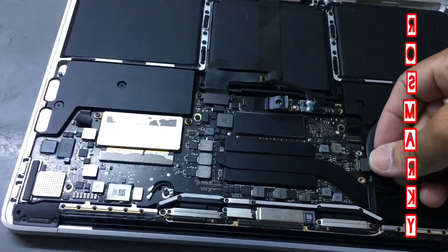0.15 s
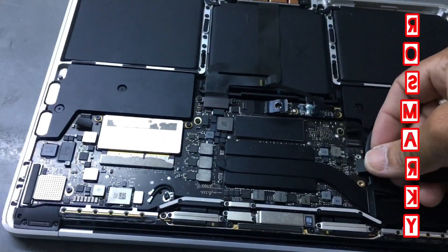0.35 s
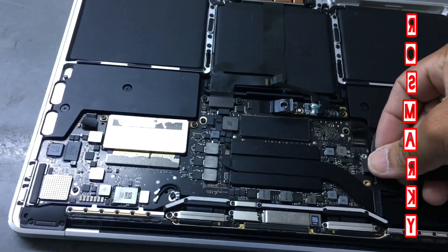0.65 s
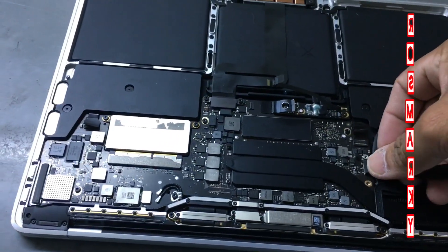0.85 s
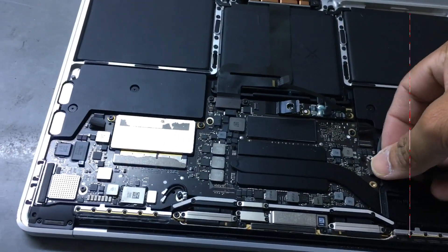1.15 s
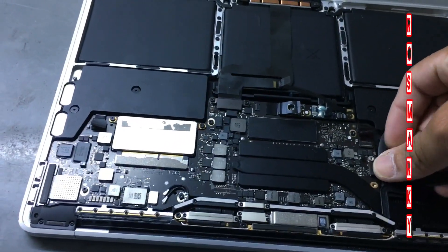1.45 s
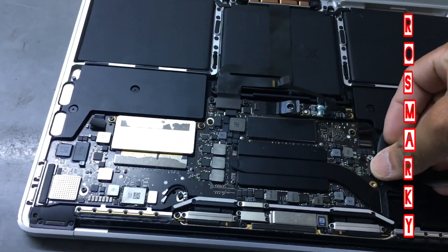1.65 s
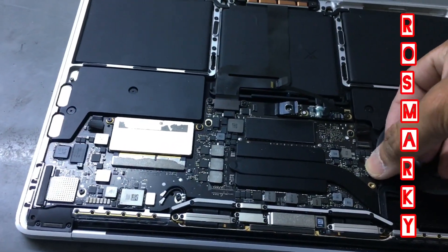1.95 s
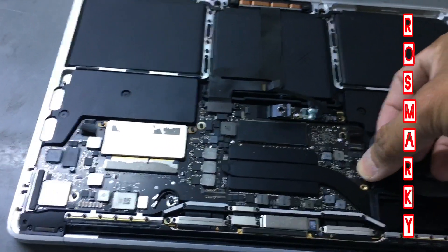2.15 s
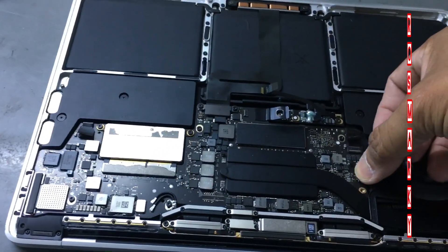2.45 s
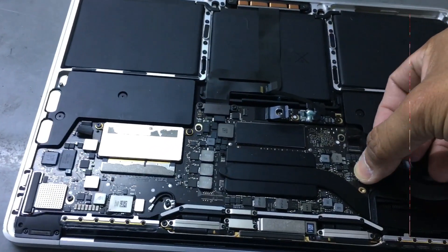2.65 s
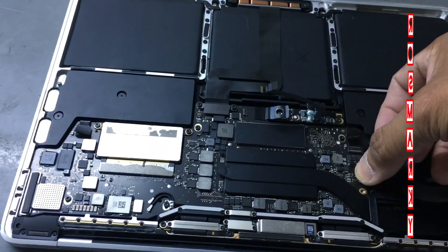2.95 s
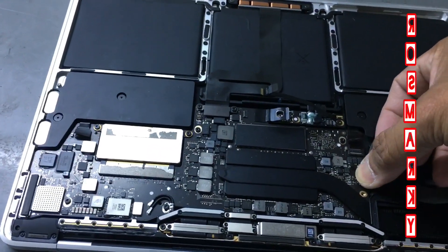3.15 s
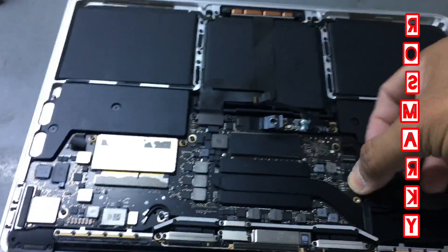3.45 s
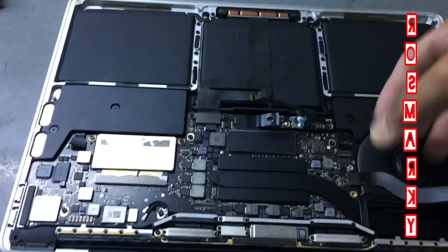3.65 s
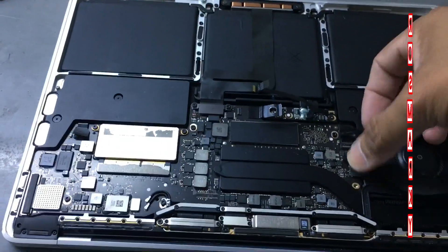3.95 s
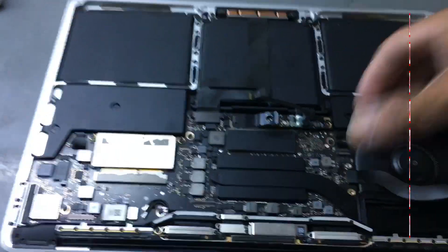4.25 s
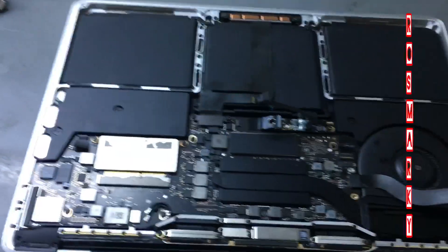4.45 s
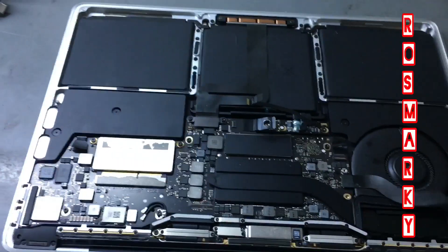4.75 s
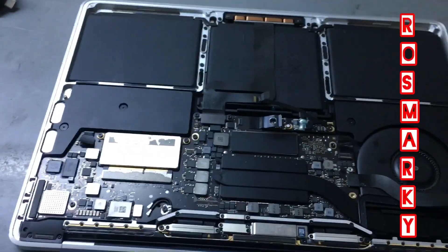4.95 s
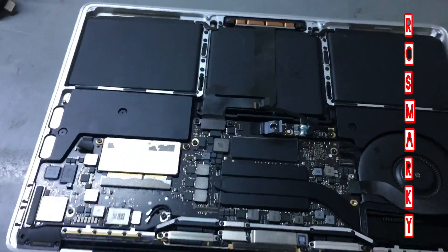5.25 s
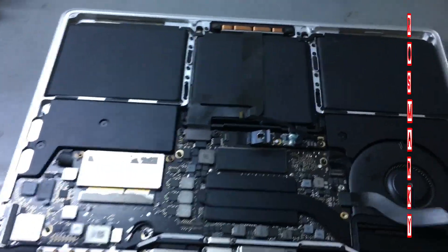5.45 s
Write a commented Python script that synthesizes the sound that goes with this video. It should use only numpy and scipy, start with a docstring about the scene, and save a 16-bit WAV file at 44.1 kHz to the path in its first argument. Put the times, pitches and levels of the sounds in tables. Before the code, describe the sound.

Faint clicks and scrapes of a thin cable being handled inside a laptop, with one sharp connector snap, over a low motor hum.

```python
"""Fingers seat a thin flex cable in an open laptop on a workbench; a motor hums throughout in the small room.
First skin brushes the parts and a fingertip squeaks twice in stick-slip on plastic.
The cable's stiff edge then ticks and scrapes on the circuit board, between dull fingertip knocks.
At 3.1 s the plug snaps home, ringing the chassis and the room.
More scrapes, ticks and knocks follow, thinning to faint grazes."""
import sys
import numpy as np
from scipy import signal
from scipy.fft import rfft, irfft, next_fast_len
from scipy.io import wavfile
from scipy.ndimage import map_coordinates

SR = 44100
rng = np.random.default_rng(int(sys.argv[2]) if len(sys.argv) > 2 else 0)


def dump_mix(stems):
    """Bounce the given channels to the path in sys.argv[1] as a 16-bit WAV at rate SR."""
    frames = np.atleast_2d(stems).T  # one column per channel
    limited = np.clip(frames, -1, 1)  # hard clip at full scale
    pcm = np.round(limited * 32767).astype(np.int16)
    wavfile.write(sys.argv[1], SR, pcm)


N = 246166

# plug's touch, snap and rebound: (time [s], ring level [dB], crack level [dB])
PLUG_HITS = [(3.1130, -17, -37), (3.1176, 0, -18), (3.1215, -20, -33)]
# chassis modes: (frequency [Hz], level [dB], t60 [s])
CHASSIS_MODES = [(82.8, -39.5, 0.6), (101.7, -40, 0.84), (221, -42, 0.079), (296, -37.5, 0.15),
                 (463, -29, 0.069), (598, -38, 0.033), (746, -32, 0.048), (954, -36, 0.19),
                 (1015, -11, 0.018), (1226, -9, 0.015), (1150, -51, 0.14), (1404, -14.5, 0.0098),
                 (2044, -19.5, 0.013), (2240, -29, 0.018), (2600, -48, 0.0056), (3770, -20, 0.0063),
                 (4020, -20, 0.0082), (5050, -30, 0.024)]
# plug shell's crack: (frequency [Hz], density [dB])
CRACK_SPECTRUM = [(500, -3), (2300, 5), (3100, 11), (4100, -9), (5200, -5), (6300, -10), (8000, -0.5),
                  (9400, 5.5), (10500, -7), (12200, 3.5), (14000, -6), (16000, -12)]
def snap(lead_s=0.0004):
    """The plug's shell cracks past its catch; an instant later the blow rings the chassis."""
    out, t = np.zeros(N), np.arange(SR // 2) / SR
    modes = sum(amp(db - 60 * t / t60) * np.sin(2 * np.pi * hz * t) for hz, db, t60 in CHASSIS_MODES)
    ring = modes * (1 - np.exp(-t / 0.00046))
    for time_s, ring_db, crack_db in PLUG_HITS:
        crack = puff(noise(CRACK_SPECTRUM, len(t)), t, attack_s=0.00026, t60_s=0.0056)
        add(out, time_s, amp(ring_db) * ring)
        add(out, time_s - lead_s, amp(crack_db) * crack)
    return out


# cable's stiff edge: (frequency [Hz], density [dB])
EDGE_SPECTRUM = [(700, -19), (2000, -20), (3000, -2.5), (4000, -1.5), (6000, 2), (9000, 3), (12500, 1.5),
                 (14000, -4.5), (16000, -1)]
# circuit board: (frequency [Hz], density [dB])
BOARD_SPECTRUM = [(200, 3), (500, -3.5), (850, -1), (1350, 2.5), (2200, 0), (3000, -7), (5000, -15.5),
                  (12000, -45)]
def contact(rasp_db, ring_db, ring_hz, board_db, board_hz, t60_s):
    """A hard edge rasps, rings and knocks the board, whose pitch depends on the spot."""
    t = np.arange(4096) / SR
    rasp = puff(noise(EDGE_SPECTRUM, len(t)), t, attack_s=0.00026, t60_s=t60_s)
    ring = puff(ringing(ring_hz, width_hz=690, size=len(t)), t, attack_s=0.000089, t60_s=t60_s)
    board = noise(BOARD_SPECTRUM, len(t), lambda hz: 1 + 3 * resonance(hz, board_hz, width_hz=270))
    knock = puff(board, t, attack_s=0.00045, t60_s=1.56 * t60_s)
    return amp(rasp_db) * rasp + amp(ring_db) * ring + amp(board_db) * knock


# cable strikes: (time [s], rasp [dB], ring [dB], ring pitch [Hz], board [dB], board pitch [Hz])
CABLE_FLICKS = [(0.206, -63, -53, 8900, -57, 2700), (.9021, -59, -54, 13150, -49, 2980),
                (1.1185, -47, -51, 8600, -58, 1700), (1.123, -40.5, -34, 8560, -48.5, 1700),
                (1.2082, -41, -53, 6950, -46.5, 1900), (1.2395, -32.5, -49, 12100, -37, 2170),
                (1.748, -44, -55, 10900, -63, 2500), (1.934, -64, -54, 9600, -76, 1800),
                (3.5529, -48.5, -49.5, 3680, -46.5, 1500), (4.041, -51.5, -61.5, 12500, -51, 1610),
                (4.4247, -61, -63, 8840, -60, 2900), (4.766, -38.5, -33, 9540, -53, 2000),
                (4.7699, -35, -35, 11600, -36.5, 1270), (4.776, -41, -43, 8700, -41, 1570),
                (4.782, -48, -50, 12000, -50, 1970), (4.846, -45.5, -55, 12000, -48.5, 1170),
                (5.1827, -60, -62, 4600, -62, 2400)]
def flicks(hard_db=-37.5, db_per_doubling=30):
    """The springy cable slips and strikes with its edge: bright clicks, the harder the shorter."""
    out = np.zeros(N)
    for time_s, rasp_db, ring_db, ring_hz, board_db, board_hz in CABLE_FLICKS:
        t60_s = 0.015 * 2 ** ((hard_db - rasp_db) / db_per_doubling)
        add(out, time_s, contact(rasp_db, ring_db, ring_hz, board_db, board_hz, t60_s))
    return out


# cable slides: (start [s], length [s], crest [0-1], hiss [dB], squeal [dB], 3 x squeal tone [Hz])
CABLE_SCRAPES = [(1.207, .052, .28, -50.5, -47, 12000, 1920, 6300),
                 (1.452, 0.048, 0.59, -52.5, -46, 3830, 7830, 10500),
                 (3.548, 0.16, 0.094, -60, -58, 1990, 7300, 7600),
                 (3.624, 0.065, .84, -43, -39, 2450, 8470, 4200),
                 (4.257, 0.038, .41, -50.5, -49, 5250, 9100, 13000)]
BOARD_DB_PER_DB = 0.51  # board level against friction level
def scrapes():
    """The cable's edge slides in tiny slips; its three-tone squeal gains on the hiss along the stroke."""
    out, t = np.zeros(N), np.arange(SR // 8) / SR
    for start_s, length_s, crest, hiss_db, squeal_db, *tones_hz in CABLE_SCRAPES:
        slips = unit(amp(1.06 * wobble(764, len(t))))
        tones = sum(amp(db) * ringing(hz, width_hz=200 + 0.05 * hz, size=len(t))
                    for hz, db in zip(tones_hz, [-3, 0, -5]))
        grip = 0.5 + 0.14 * t / length_s
        squeal = amp(squeal_db) * grip * unit(tones)
        board = amp(-30 + BOARD_DB_PER_DB * hiss_db) * noise(BOARD_SPECTRUM, len(t))
        hiss = amp(hiss_db) * noise(EDGE_SPECTRUM, len(t))
        add(out, start_s, stroke(t, length_s, crest) * slips * (hiss + squeal + board))
    return out


# fingertip on the board: (time [s], level [dB], board pitch [Hz])
FINGER_KNOCKS = [(.218, -53.5, 2700), (1.2966, -47.5, 2020), (1.4512, -41.5, 900), (1.8285, -50, 1020),
                 (3.626, -39.5, 1760), (4.0092, -43.5, 980), (4.053, -45, 1480), (4.5325, -49, 1240),
                 (4.544, -55, 1080), (4.592, -58, 1260), (4.975, -61, 2200), (5.3872, -53, 1260),
                 (5.477, -58, 1130)]
def knocks(firm_db=-41.5, db_per_doubling=6.5, nail_rasp_db=-18.5, nail_ring_db=-12.5, nail_hz=3550):
    """A fingertip lands on the board with a touch of nail: dull contacts, the firmer the shorter."""
    out = np.zeros(N)
    for time_s, db, board_hz in FINGER_KNOCKS:
        t60_s = 0.017 * 2 ** ((firm_db - db) / db_per_doubling)
        add(out, time_s, contact(db + nail_rasp_db, db + nail_ring_db, nail_hz, db, board_hz, t60_s))
    return out


# fingertip squeaks: (start [s], length [s], start pitch [Hz], end pitch [Hz], level [dB])
FINGER_SQUEAKS = [(.155, 0.043, 932, 780, -58), (0.206, 0.05, 1010, 551, -55)]
def squeaks(jitter=0.028, harmonics_db=(5.5, 4.5, -2.0, -7)):
    """Skin sticks and slips on plastic; the pitch falls as the finger slows."""
    out, t = np.zeros(N), np.arange(4096) / SR
    for start_s, length_s, start_hz, end_hz, db in FINGER_SQUEAKS:
        progress = np.clip(t / length_s, 0, 1)
        glide_hz = start_hz + (end_hz - start_hz) * progress
        pitch_hz = glide_hz * (1 + jitter * wobble(310, len(t)))
        phase = 2 * np.pi * np.cumsum(pitch_hz) / SR
        tone = sum(amp(level) * np.sin(k * phase) for k, level in enumerate(harmonics_db, 1))
        add(out, start_s, amp(db) * np.sin(np.pi * progress) * unit(tone))
    return out


# skin over cable and board: (start [s], length [s], crest [0-1], level [dB])
SKIN_BRUSHES = [(0.014, 0.073, 0.14, -59.5), (0.085, 0.24, 0.1, -62), (0.31, 0.083, 0.3, -67),
                (0.916, .06, .5, -67), (1.001, 0.47, 0.46, -65), (1.549, 0.091, 0.2, -67.5),
                (1.74, .078, 0.14, -57), (1.848, 0.27, 0, -66), (3.481, 0.073, .35, -64.5),
                (4.2, 0.073, 0.6, -60.5), (4.781, 0.081, 0.2, -64), (5.315, 0.079, 0.2, -62.5)]
# skin friction: (frequency [Hz], density [dB])
SKIN_SPECTRUM = [(1000, -20), (2500, 2), (4500, 3.5), (6500, 3), (9300, 3), (10500, -4.5), (11700, 1),
                 (13000, -6), (16000, -3)]
def brushes(snags_per_s=45, release_s=0.0024, bright_hz=11000):
    """Skin ridges rustle, now and then snagging in a tiny crackle; the board murmurs underneath."""
    out, t = np.zeros(N), np.arange(SR // 2) / SR
    for start_s, length_s, crest, db in SKIN_BRUSHES:
        snags = (rng.random(len(t)) < snags_per_s / SR) * rng.uniform(0.5, 1.8, len(t))
        releases = signal.fftconvolve(snags, np.exp(-t / release_s))[:len(t)]
        roughness_db = 1.7 * wobble(600, len(t)) + 1.1 * wobble(92, len(t))
        friction = unit(amp(roughness_db) * (1 + 1.2 * releases))
        rustle = noise(SKIN_SPECTRUM, len(t), lambda hz: 1 + resonance(hz, bright_hz, width_hz=1400))
        board = amp(-29.5 + BOARD_DB_PER_DB * db) * noise(BOARD_SPECTRUM, len(t))
        add(out, start_s, stroke(t, length_s, crest) * friction * (amp(db) * rustle + board))
    return out


# fingers shifting: (start [s], end [s])
GRAZE_SPANS = [(1.999, 2.17), (5.39, 5.46)]
def grazes(ticks_per_s=18, scatter_db=2, scatter_octaves=0.71, scatter_slots=0.39):
    """Loose fingers graze the parts: faint ticks of random strength, pitch and spacing."""
    out = np.zeros(N)
    for start_s, end_s in GRAZE_SPANS:
        for slot_s in np.arange(start_s, end_s, 1 / ticks_per_s):
            late, strength, pitch = rng.uniform(-1, 1, 3)
            tick = contact(rasp_db=-59, ring_db=-61, ring_hz=6900 * 2 ** (scatter_octaves * pitch),
                           board_db=-67, board_hz=1800, t60_s=0.024)
            add(out, slot_s + scatter_slots * late / ticks_per_s, amp(scatter_db * strength) * tick)
    return out


# laptop's radiation into the room: (frequency [Hz], gain [dB])
SNAP_RADIATION = [(120, -14), (400, -10), (600, -6), (1000, -3.5), (1600, -6), (2200, -5.5), (3000, -16),
                  (4100, -13.5), (6500, -25), (8500, -20.5), (11000, -25), (16000, -30)]
def snap_reverb(delay_s=0.002, gain_db=4.0):
    """The snap leaves all faces of the laptop at once and fills the room with a smooth decay."""
    out, snap_s = np.zeros(N), PLUG_HITS[1][0]
    decay = filtered(room_tail(), lambda hz: amp(along(SNAP_RADIATION, hz)))
    add(out, snap_s + delay_s, amp(gain_db) * decay)
    return out


# room decay: (frequency [Hz], t60 [s])
ROOM_T60 = [(100, 0.9), (1000, 0.5), (3000, 0.39), (8000, 0.33), (16000, 0.31)]
def room_tail(build_up_s=0.00026):
    """Diffuse response of the small room, energy 1; the treble dies first."""
    hz, t, bands = signal.stft(rng.standard_normal(SR // 2), SR, nperseg=256)
    fade = amp(-60 * t / along(ROOM_T60, hz)[:, None])
    _, decay = signal.istft(bands * fade, SR, nperseg=256)
    decay *= 1 - np.exp(-np.arange(len(decay)) / SR / build_up_s)
    return decay / np.linalg.norm(decay)


# hum envelope: (time [s], level [dB])
MOTOR_LEVEL = [(0.1, -45.5), (2.05, -43.5), (2.4, -42.5), (3.84, -43.5), (3.96, -42.5), (5.21, -44),
               (5.5, -43)]
# hum partials: (frequency [x motor speed], relative level [dB])
MOTOR_ORDERS = [(1, 2), (2.04, -14), (3.03, -19.5), (4.1, -24), (5.03, -27), (6.17, -21.5)]
def motor(speed_hz=58.5):
    """A motor hums low; its higher partials waver more."""
    hum, t = np.zeros(N), np.arange(N) / SR
    for order, db in MOTOR_ORDERS:
        waver_rad = 0.047 * order ** 1.52 * wobble(5, N)
        hum += amp(db) * np.sin(2 * np.pi * (order * speed_hz * t + rng.random()) + waver_rad)
    level_db = np.interp(t, *np.transpose(MOTOR_LEVEL))
    return amp(level_db) * unit(hum)


# moving air: (frequency [Hz], density [dB])
RUMBLE_SPECTRUM = [(20, -39), (30, -9), (42, 1.5), (75, 0.5), (110, 5), (170, -3.5), (205, -5), (245, -2.5),
                   (350, -5.5), (420, -15), (600, -39), (1200, -67)]
# background hiss: (frequency [Hz], density [dB])
HISS_SPECTRUM = [(250, -26), (420, -3.5), (587, -3.5), (886, -6.5), (1000, -6), (1260, -8), (2050, -10),
                 (2950, -16), (4880, -19), (8700, -21.5), (10600, -23), (14800, -22), (16000, -21)]
def air(rumble_db=-55, drift_db=1.4, hiss_db=-64):
    """Moving air rumbles unevenly, with a faint steady hiss."""
    rumble = amp(rumble_db + drift_db * wobble(4.3, N)) * noise(RUMBLE_SPECTRUM, N)
    return rumble + amp(hiss_db) * noise(HISS_SPECTRUM, N)


def amp(db):
    """Decibels to gain."""
    return 10 ** (np.asarray(db) / 20)


def unit(x):
    """x at rms 1."""
    return x / np.sqrt(np.mean(x ** 2) + 1e-20)


def along(points, hz):
    """(frequency [Hz], value) points read on a log axis."""
    points_hz, values = np.transpose(points)
    return np.interp(np.log(hz + 1), np.log(points_hz + 1), values)


def filtered(x, response):
    """Zero-phase filter of gain response(hz)."""
    size = next_fast_len(len(x) + 8192)
    return irfft(rfft(x, size) * response(np.fft.rfftfreq(size, 1 / SR)), size)[:len(x)]


def noise(spectrum, size, colour=lambda hz: 1):
    """Noise at rms 1, shaped by spectrum and colour."""
    return unit(filtered(rng.standard_normal(size), lambda hz: amp(along(spectrum, hz)) * colour(hz)))


def resonance(hz, centre_hz, width_hz):
    """Gain of one resonance, 1 at its centre."""
    return 1 / np.hypot(1, 2 * (hz - centre_hz) / width_hz)


def ringing(centre_hz, width_hz, size):
    """Narrow-band noise at rms 1: a resonance driven by friction."""
    return unit(filtered(rng.standard_normal(size), lambda hz: resonance(hz, centre_hz, width_hz) ** 2))


def wobble(knots_per_s, size):
    """Smooth random curve."""
    knots = rng.standard_normal(int(size * knots_per_s / SR) + 4)
    return map_coordinates(knots, [np.arange(size) * knots_per_s / SR])


def stroke(t, length_s, crest):
    """Pressure that swells to its crest, a fraction of the length in, and breaks off."""
    return np.interp(t / length_s, [0, np.clip(crest, 0.05, 0.95), 1], [0, 1, 0]) ** 0.55


def puff(x, t, attack_s, t60_s):
    """Noise x under a quick rise and exponential fall, with the energy of that envelope at peak 1."""
    envelope = (1 - np.exp(-t / attack_s)) * amp(-60 * t / t60_s)
    burst = x * envelope
    return burst / np.linalg.norm(burst) * np.linalg.norm(envelope) / envelope.max()


def add(track, time_s, sound):
    """Mix a sound into the track."""
    part = track[round(time_s * SR):][:len(sound)]
    part += sound[:len(part)]


def scene():
    """Snap and handling in the room, over motor and air; mono."""
    handling = flicks() + knocks() + grazes() + scrapes() + brushes() + squeaks()
    wall_send = [(2000, -13), (5000, -13.5), (8500, -17.5)]  # (frequency [Hz], gain [dB])
    at_walls = filtered(handling, lambda hz: amp(along(wall_send, hz)))
    handling_reverb = signal.fftconvolve(at_walls, room_tail())[:N]
    return (snap() + snap_reverb() + handling + handling_reverb + motor() + air())[None]


def record(dry, cutoff_hz=15900):
    """Brick-wall low-pass."""
    return np.array([filtered(x, lambda hz: hz < cutoff_hz) for x in dry])


dry = scene()
out = record(dry)
dump_mix(out)
```